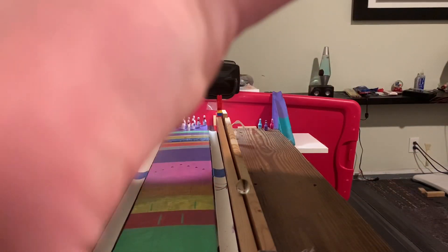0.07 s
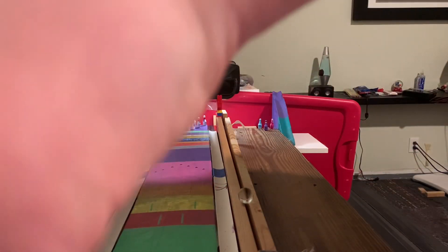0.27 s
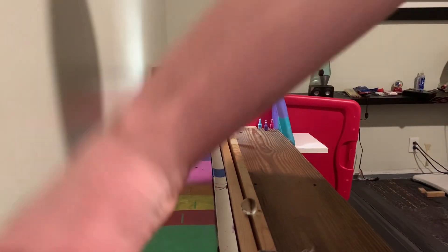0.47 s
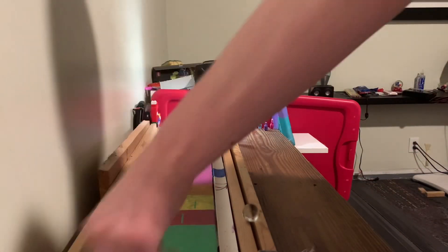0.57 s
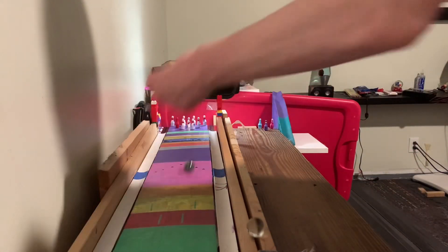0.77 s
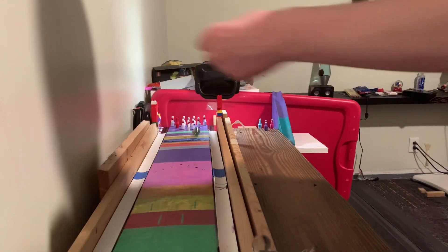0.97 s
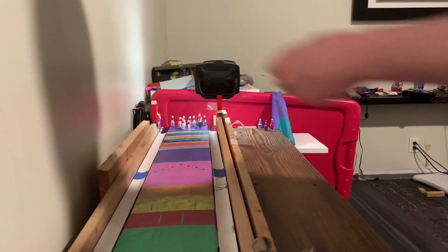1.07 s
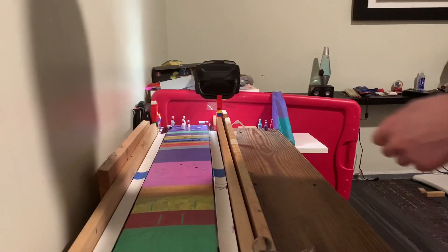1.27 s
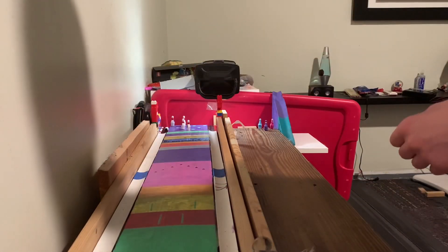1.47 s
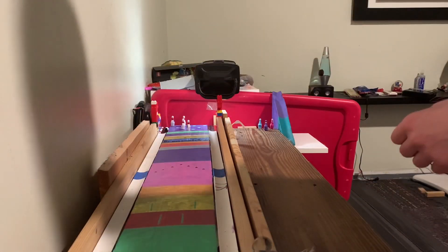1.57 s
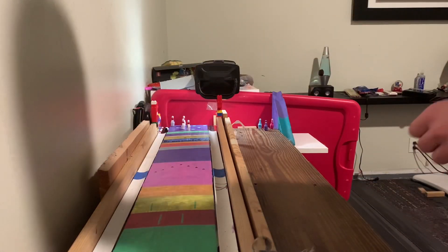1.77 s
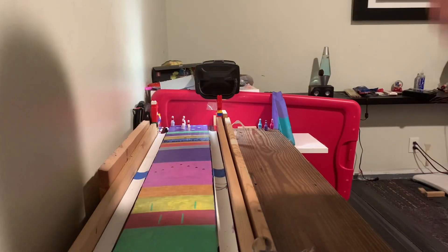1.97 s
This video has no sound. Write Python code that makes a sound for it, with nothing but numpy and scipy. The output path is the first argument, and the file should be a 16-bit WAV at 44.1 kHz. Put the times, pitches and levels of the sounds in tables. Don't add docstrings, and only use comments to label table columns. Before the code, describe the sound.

After faint finger ticks, a small ball hits a wood board, bounces and rolls away, striking little pins with sharp clacks and hollow knocks; the rattling fades indoors, picked up by a phone near the lane.

```python
import sys
import numpy as np
from scipy import signal
from scipy.fft import rfft, irfft
from scipy.io import wavfile
from scipy.ndimage import uniform_filter1d

SR = 44100
rng = np.random.default_rng(int(sys.argv[2]) if len(sys.argv) > 2 else 0)


def store_pcm(level_fs):
    pcm = np.round(np.clip(level_fs, -1, 1) * 32767).astype(np.int16)
    wavfile.write(sys.argv[1], SR, np.atleast_2d(pcm).T)


def linear_from_db(decibels):
    return 10 ** (np.asarray(decibels, float) / 20)


N = 88817
T = np.arange(N) / SR

# pitch_hz, level_db per hz
AIR_COLOUR = [(15, 13.5), (25, -81), (48, 3), (147, -10), (286, 3.5), (326, -9), (916, -20.5),
              (1190, -24.5), (14000, -74)]
# pitch_hz, width_hz, level_db
HUM_BANDS = [(58.4, 6.6, -49.5), (100, 93, -49), (300, 16, -106), (363, 5.5, -57.5), (902, 17, -57.5)]
# start_s, peak_db, pitch_hz
FINGER_TAPS = [
    (0.1141, -33, 3700),
    (0.807, -44.5, 6000),
    (0.304, -72, 2960),
    (0.463, -44.5, 5460),
    (0.4825, -46.5, 4040),
    (0.5592, -47.5, 6000),
    (0.5898, -33, 2700),
]
# start_s, peak_db, pitch_hz of the spot hit
MARBLE_HOPS = [(0.615, -3, 371), (0.617, -5, 554), (0.6158, -11, 2380), (0.6637, -12, 796),
               (0.7018, -13, 783), (0.72, -23, 780), (0.741, -16, 880), (0.759, -26, 790),
               (0.778, -30.5, 740), (0.8085, -11, 755), (0.835, -18, 930), (0.855, -23, 1110),
               (0.8995, -16.5, 706), (0.916, -30, 864), (0.934, -26, 990), (0.954, -34.5, 795),
               (1.9288, -27, 900), (1.9281, -26.5, 1410)]
# pitch_hz, level_db, t60_s
LANE_MODES = [(371, 1, 0.03), (457, -8.5, 0.054), (565, 2.5, 0.038), (744, 0.5, 0.056), (879, 5, 0.022),
              (958, 1, 0.028), (1089, 5.5, 0.029), (1240, -12, 0.07), (1394, -4.5, 0.035), (1656, -6, .035),
              (1760, 4, 0.013), (1950, 4.5, 0.063), (2560, 4, 0.062), (2706, -4, 0.014)]
# start_s, level_db
ROLL_LEVEL = [
    (.612, -34),
    (.68, -33),
    (.8, -43),
    (.92, -41.5),
    (1.04, -40.5),
    (1.1, -35.5),
]
# pitch_hz, level_db
ROLL_COLOUR = [(60, -17.5), (500, 1), (800, -9), (1400, -8.5), (3000, -24.5), (4700, -35), (6500, -42.5),
               (9000, -55.5)]
# start_s, peak_db, pitch_hz
PIN_TICKS = [(0.9917, -16, 2460), (0.9919, -22, 4300), (0.9933, -33, 3000), (0.9947, -48, 6700),
             (1.0105, -48, 4030), (1.264, -17, 2030), (1.28, -23, 1500), (1.299, -22, 1910),
             (1.315, -20, 2260), (1.331, -23, 1390), (1.383, -13, 1280), (1.3843, -19, 5500),
             (1.392, -8.5, 3000), (1.428, -43, 4000), (1.468, -17.5, 3470), (1.479, -20, 5500),
             (1.515, -20, 1310), (1.548, -47, 2470), (1.576, -23.5, 2530), (1.593, -42, 1770),
             (1.6528, -18.5, 1340), (1.66, -18, 3350), (1.70, -51, 2030), (1.761, -25, 1440)]
# start_s, level_db
RATTLE_LEVEL = [
    (.992, -53),
    (1.04, -52.5),
    (1.12, -27),
    (1.25, -27.5),
    (1.36, -35),
    (1.6, -36),
    (1.75, -43),
    (1.86, -54),
    (1.96, -56),
    (2.02, -54.5),
]
# pitch_hz, level_db
RATTLE_COLOUR = [(60, -13), (300, -6.5), (1500, -6), (3500, -6.5), (6300, -12.5), (8500, -16), (12100, -45),
                 (16000, -40)]
# start_s, treble_lift_db
RATTLE_TREBLE = [
    (.992, -11),
    (1.2, -6),
    (1.27, -19),
    (1.44, -14),
    (1.55, -7),
    (1.8, 0),
    (1.93, -2),
    (2.02, -14),
]
# start_s, click_peak_db, ring_db
PIN_CLICKS = [(0.9921, -24, -50), (1.0095, -29.5, -69), (1.0375, -2.5, -13), (1.051, 1, -9.5),
              (1.06, -30, -13.5), (1.069, -6.5, -27), (1.086, -32, -18), (1.1018, -22, -25),
              (1.1101, -1.5, -24.5), (1.122, -2, -40.5), (1.1807, -3, -17), (1.189, -12, -15),
              (1.1977, -9, -14), (1.2145, -17, -31), (1.239, -11, -7), (1.249, -24, -32),
              (1.2734, -36, -18), (1.385, -42, -62), (1.4267, -34.5, -48), (1.4488, -35, -19.5),
              (1.468, -21, -47), (1.479, -39, -49), (1.5134, -35, -27), (1.5502, -37, -23.5),
              (1.575, -38.5, -47), (1.6115, -33, -38), (1.622, -21, -17.5)]
# pitch_hz, level_db per hz
CLICK_COLOUR = [(800, -16), (2000, -18), (4000, -14), (6550, -1.5), (8550, -1.5), (11000, -6.5),
                (16000, -13.5)]
# pitch_hz, level_db, t60_s
PIN_MODES = [(9820, -12, 0.049), (9430, -3.5, 0.075), (9560, -0.5, 0.064), (9630, -14, 0.049),
             (10030, -29, 0.047), (9650, -7, 0.043), (10100, -29, 0.021)]
# start_s, peak_db, pitch_hz
STOP_KNOCKS = [(1.043, -4.5, 442), (1.1112, 2.5, 690), (1.1115, -14.5, 1400), (1.116, -6, 600),
               (1.121, -8.5, 1070), (1.126, -10, 466), (1.1885, -6.5, 700), (1.192, -6.5, 1070),
               (1.196, -3.5, 576), (1.204, -10.5, 232), (1.215, -5, 1300), (1.227, -9, 980),
               (1.244, -27, 1050), (1.265, -9, 169), (1.298, -44, 248), (1.316, -53, 357),
               (1.396, -11, 514), (1.469, -16, 740), (1.82, -26.5, 252), (1.832, -43, 308)]
# pitch_hz, level_db, t60_s
STOP_MODES = [(130, -7.5, 0.16), (201.5, -11.5, 0.19), (248, -15.5, 0.23), (306.4, -9, 0.059),
              (485, -0.5, 0.03), (600, -12, 0.066), (700, -7.5, 0.062), (888, -1.5, 0.031),
              (1110, 0, 0.065), (1216, -2, 0.043), (1630, 3, 0.035), (1820, 1, 0.089), (2500, 5, 0.13)]
# start_s, level_db, pitch_hz, t60_s
STOP_BOOMS = [
    (1.116, -29, 117, 0.13),
    (1.203, -32, 130, 0.25),
    (1.235, -24, 69, 0.077),
    (1.27, -47, 100, 0.07),
]
# pitch_hz, left_minus_right_db
PORT_BALANCE = [(100, 1), (300, 1), (1000, 2), (2500, -1.5), (5500, -4.5), (7500, 0)]


def colour(x, points):
    f = np.maximum(np.fft.rfftfreq(2048, 1 / SR), 1)
    p = np.array(points)
    log_gain = np.interp(np.log(f), np.log(p[:, 0]), p[:, 1]) * np.log(10) / 20
    cepstrum = irfft(log_gain)
    cepstrum[1:1024] *= 2
    cepstrum[1025:] = 0
    h = irfft(np.exp(rfft(cepstrum)))
    return signal.fftconvolve(x, h / np.sqrt(np.sum(h ** 2)))[:N]


def ring(x, hz, t60):
    pole = np.exp(2j * np.pi * min(hz, 0.45 * SR) / SR - np.log(1000) / (t60 * SR))
    return signal.lfilter([1], [1, -pole], x).imag


def train(times, sizes):
    x = np.zeros(N)
    np.add.at(x, np.clip((np.asarray(times) * SR).astype(int), 0, N - 1), sizes)
    return x


def curve(rows):
    r = np.array(rows)
    return linear_from_db(np.interp(T, r[:, 0], r[:, 1])) * (T >= r[0, 0]) * (T <= r[-1, 0])


def grains(rate, spread_db):
    contacts = rng.random(N) < rate / SR
    x = contacts * linear_from_db(spread_db * rng.exponential(size=N)) * rng.standard_normal(N)
    return x / x.std()


def bursts(times, dbs, t60):
    fade = np.exp(-np.log(1000) / (t60 * SR))
    return signal.lfilter([1], [1, -fade], train(times, linear_from_db(dbs))) * rng.standard_normal(N)


def struck(hits, modes, width_oct, push_s, thock_db, thock_t60):
    s, db, hz = np.array(hits).T
    luck = rng.standard_normal((len(s), len(modes)))
    x = np.zeros(N)
    for k, (mode_hz, mode_db, mode_t60) in enumerate(modes):
        far_db = 8.0 * (np.log2(mode_hz / hz) / width_oct) ** 2
        blow = linear_from_db(db + mode_db + 2 * luck[:, -1 - k] - far_db)
        x += ring(train(s, np.sign(luck[:, k]) * blow), mode_hz, mode_t60)
    for start, peak_db, pitch in hits:
        x += ring(train([start], linear_from_db(peak_db + thock_db)), pitch, thock_t60)
    push = np.exp(-(T[:200] / push_s - 2) ** 2)
    return np.convolve(x, push / push.sum())[:N]


def air():
    level_db = -45.5
    mid, side = (colour(rng.standard_normal(N), AIR_COLOUR) for _ in range(2))
    side = colour(side, [(60, -4.5), (400, -8.0), (2000, -1.5)]) * linear_from_db(5.5)
    for hz, width, db in HUM_BANDS:
        band = ring(rng.standard_normal(N), hz, 3.7 / width)
        mid = mid + linear_from_db(db - level_db) * band / band.std()
    return linear_from_db(level_db - 2.5) * np.array([mid + side, mid - side])


def fingers():
    x = np.zeros(N)
    for s, db, hz in FINGER_TAPS:
        x += ring(bursts([s], db - 17.5, 0.062), hz, 0.00095)
        x += linear_from_db(-19.5) * bursts([s], db, 0.0015)
    return x


def marble_skid():
    force = np.interp(T, (0.598, 0.614), (0, 1), right=0) ** 2
    return ring(force * rng.standard_normal(N), 1560, 0.02) * linear_from_db(-17 - 28)


def marble_roll():
    return curve(ROLL_LEVEL) * colour(grains(2500, 1.0), ROLL_COLOUR)


def hop_cracks():
    s, db, _ = np.array(MARBLE_HOPS).T
    return colour(bursts(s, 2.11 * db - 4.5, 0.016),
                  [(300, -17.0), (1000, 21), (2800, 13), (4000, -15.5), (14000, -38)])


def hop_board():
    board = struck(MARBLE_HOPS, LANE_MODES, width_oct=0.64, push_s=0.00014, thock_db=1.5, thock_t60=0.013)
    return linear_from_db(-9.5) * signal.lfilter(*signal.butter(2, 280, "high", fs=SR), board)


def hop_pings():
    s, db, _ = np.array(MARBLE_HOPS).T
    return ring(bursts(s, 0.5 * db - 51.5, 0.0081), 4500, 0.0052)


def pin_ticks():
    x = np.zeros(N)
    for s, db, hz in PIN_TICKS:
        x += ring(bursts([s], db - 10, 0.0044) + train([s], linear_from_db(db - 5)), hz, 0.0018)
    return x


def pin_contacts():
    patches = np.repeat(rng.standard_normal(N // 150 + 1), 150)
    patches = uniform_filter1d(patches, size=150)[:N]
    return curve(RATTLE_LEVEL) * linear_from_db(3.92 * patches) * grains(9000, 0.78)


def pin_rattle(contacts):
    treble = signal.lfilter(*signal.butter(2, 10400, "high", fs=SR), contacts)
    return colour(contacts, RATTLE_COLOUR) + curve(RATTLE_TREBLE) * treble


def pin_rings(contacts):
    s, _, ring_db = np.array(PIN_CLICKS).T
    luck = rng.standard_normal((len(s), len(PIN_MODES)))
    x = np.zeros(N)
    for k, (hz, db, t60) in enumerate(PIN_MODES):
        blows = linear_from_db(ring_db - 8.5 + 4.2 * luck[:, -1 - k]) * np.sign(luck[:, k])
        rubbing = linear_from_db(-7 - 30.5) * contacts * rng.standard_normal(N)
        x += linear_from_db(db) * ring(train(s, blows) + rubbing, hz, t60)
    return x


def pin_clicks():
    s, click_db, _ = np.array(PIN_CLICKS).T
    return colour(bursts(s, click_db - 9.5, 0.0093), CLICK_COLOUR)


def stop_knocks():
    return linear_from_db(-11) * struck(STOP_KNOCKS, STOP_MODES, width_oct=1.26, push_s=0.00015,
                             thock_db=-2.5, thock_t60=0.019)


def stop_boom():
    x = np.zeros(N)
    push = np.hanning(200) / 100
    for s, db, hz, t60 in STOP_BOOMS:
        x += ring(np.convolve(train([s], linear_from_db(db)), push)[:N], hz, t60)
    return x


def place(x, pan_db):
    return linear_from_db(np.array([[pan_db / 2], [-pan_db / 2]])) * x


def room(x):
    t = T[:SR // 2]
    noise = rng.standard_normal((3, len(t)))
    low = signal.lfilter([0.12], [1, -0.88], noise)
    bass = signal.lfilter([0.04], [1, -0.96], noise)
    tail = (low[:2] - bass[:2] + bass[2]) * linear_from_db(-60 * t / 0.41)
    tail = tail + 0.5 * (noise - low)[:2] * linear_from_db(-60 * t / 0.45)
    early = linear_from_db(6.5 - 60 * t / 0.041)
    tail = tail * (1 + early) * np.clip(t / 0.001, 0, 1)
    return signal.fftconvolve(x[None], tail / np.sqrt(np.sum(tail ** 2) / 2), axes=1)[:, :N]


def scene():
    lane = hop_cracks() + marble_skid() + hop_board() + hop_pings() + marble_roll()
    contacts = pin_contacts()
    pins = pin_rings(contacts) + pin_clicks() + pin_rattle(contacts)
    others = pins + stop_knocks() + stop_boom() + pin_ticks() + fingers()
    return place(lane, 4.5) + place(others, 3) + linear_from_db(-2) * room(lane + others) + air()


def roll_off(x):
    return signal.sosfilt(signal.butter(12, 16700, fs=SR, output="sos"), x)


def record(dry):
    low_cut_hz, top_hz, mono_hz = 58, 16000, 450
    spread_hz, spread_s = 1540, 0.0013
    left_late = 8.56
    f = np.maximum(np.fft.rfftfreq(N, 1 / SR), 1)
    side = np.array([[1], [-1]])
    x = rfft(np.tanh(dry * 0.88) / 0.9)
    x = x / np.sqrt(1 + (low_cut_hz / f) ** 6 + (f / top_hz) ** 100)
    mid = x.mean(axis=0)
    x = mid + (x - mid) * f / np.hypot(f, mono_hz)
    scatter = rfft(rng.standard_normal((2, 900)) * np.exp(-T[:900] / spread_s), N)
    low = 1 / (1 + (f / spread_hz) ** 2)
    phase = 1.2 * (1 - low) * scatter.real / scatter.real.std()
    hz, db = np.array(PORT_BALANCE).T
    balance = linear_from_db(side * np.interp(np.log(f), np.log(hz), db) / 2)
    own = x * np.exp(1j * phase) * balance
    turn = 2 * np.pi * (f - 500) / SR * left_late
    shared = x[0] * np.exp(-0.5j * side * (turn - 0.4 * np.sin(2 * turn)))
    share = 0.86 * np.clip((f - 6900) / 900, 0, 1)
    mix = irfft(np.sqrt(1 - share) * own + np.sqrt(share) * shared, N)
    return roll_off(mix)


dry = scene()
out = record(dry)
store_pcm(out)
```